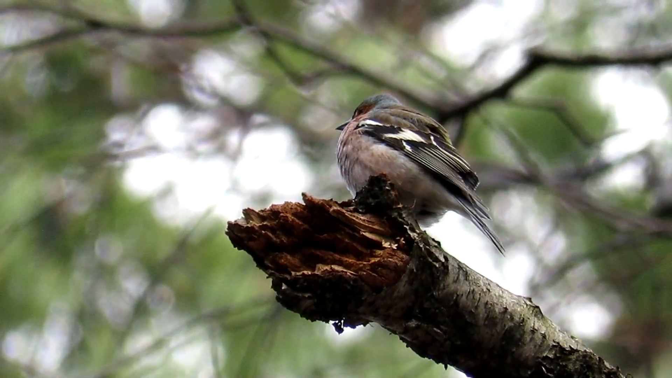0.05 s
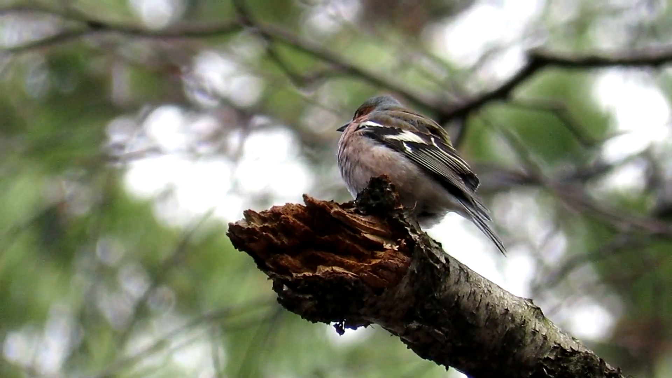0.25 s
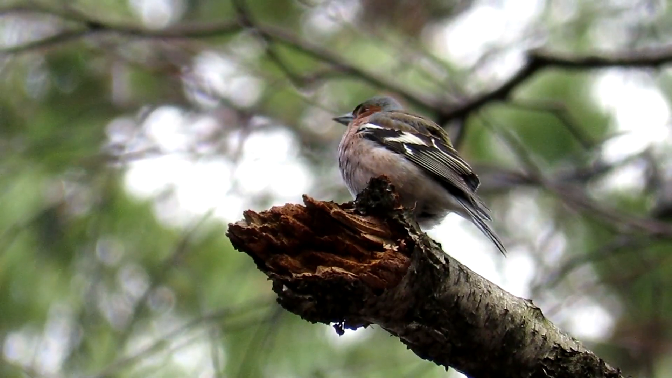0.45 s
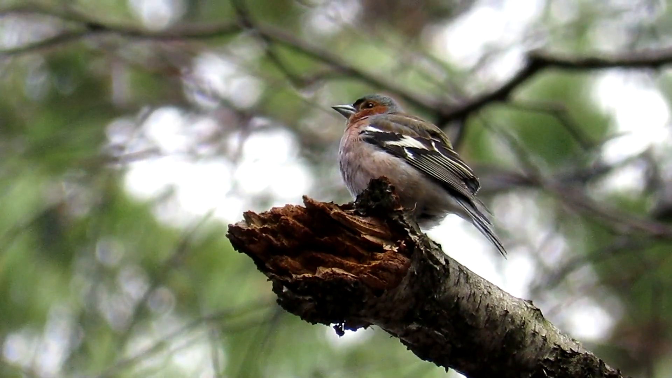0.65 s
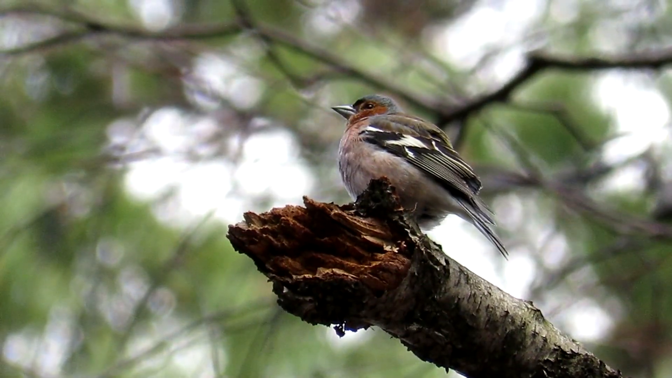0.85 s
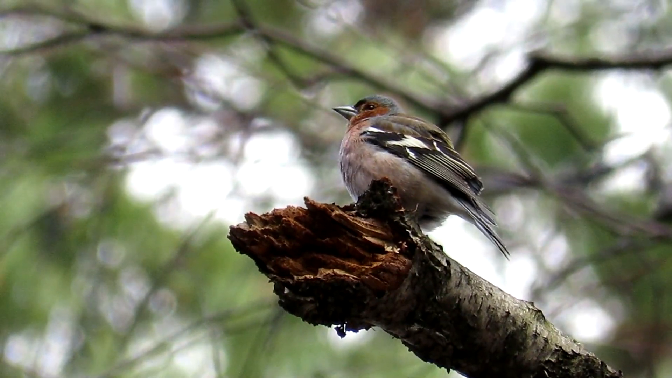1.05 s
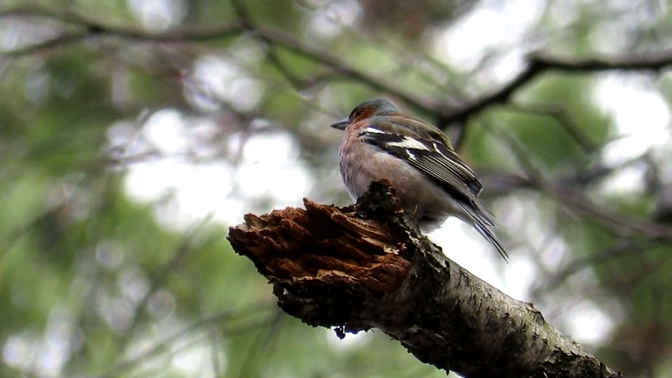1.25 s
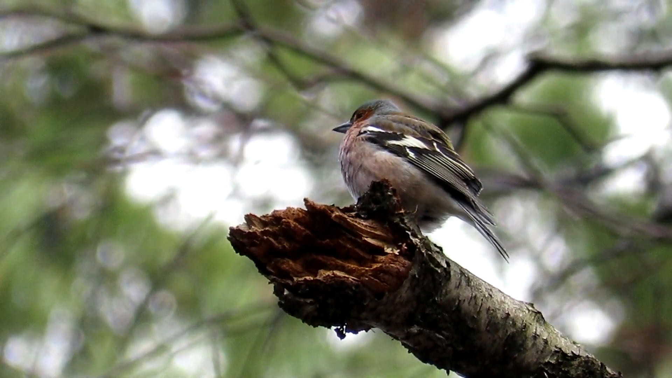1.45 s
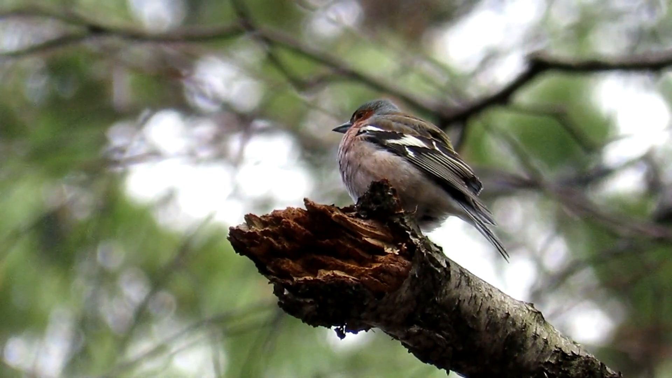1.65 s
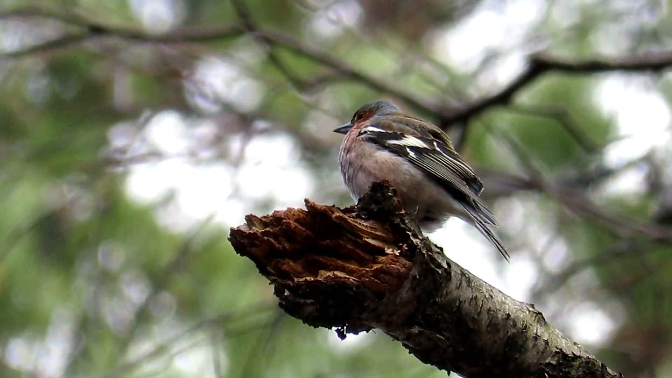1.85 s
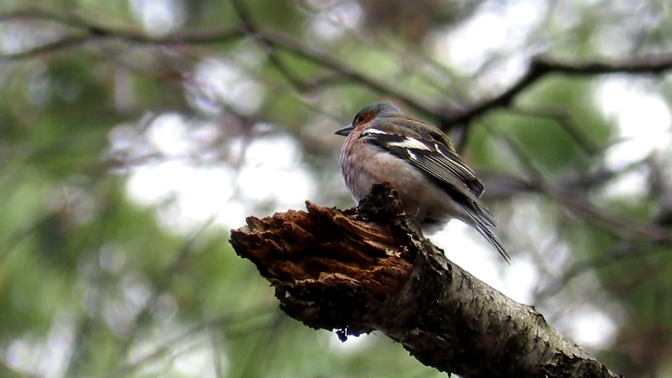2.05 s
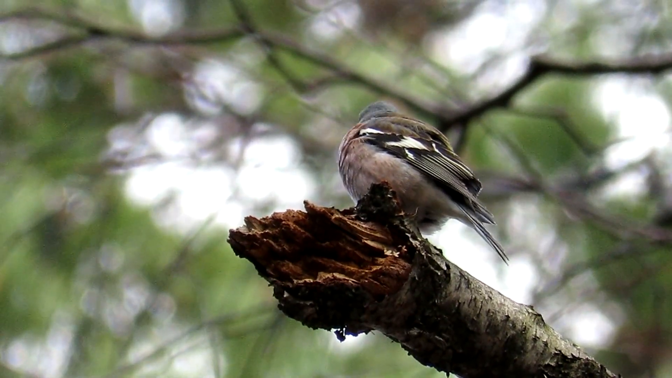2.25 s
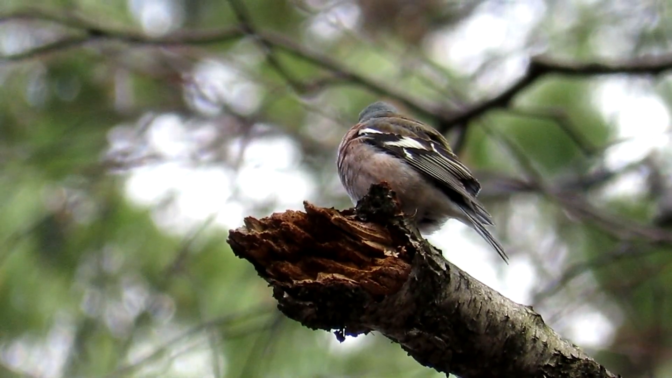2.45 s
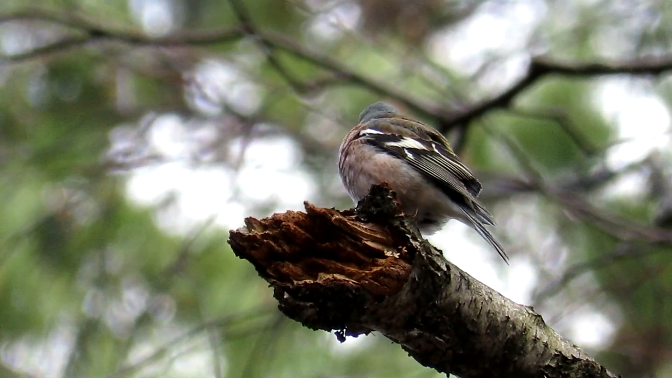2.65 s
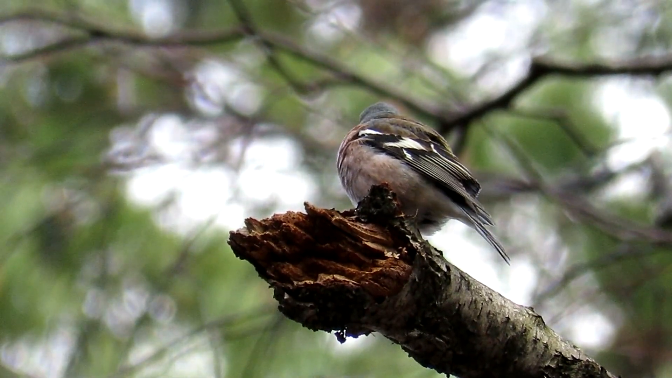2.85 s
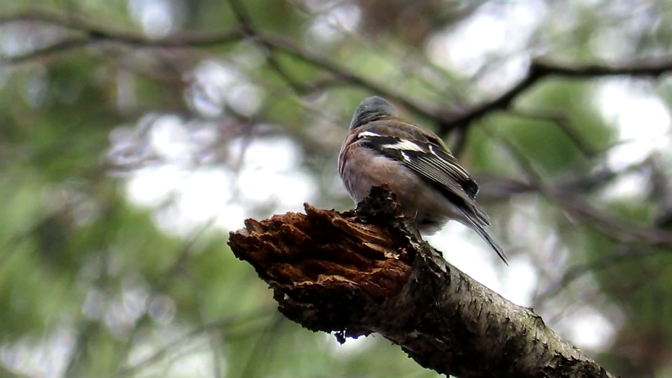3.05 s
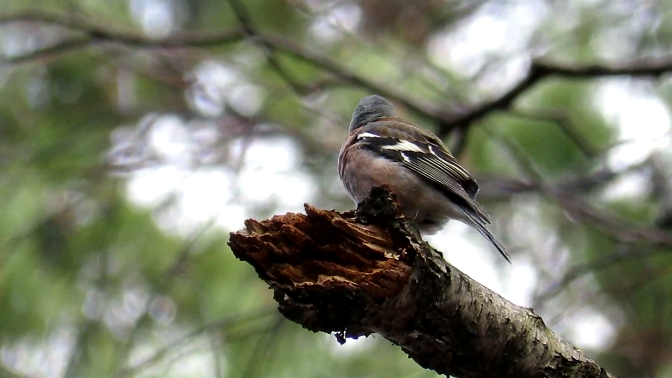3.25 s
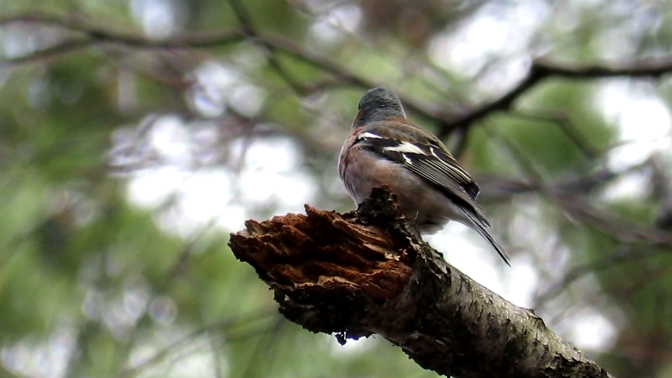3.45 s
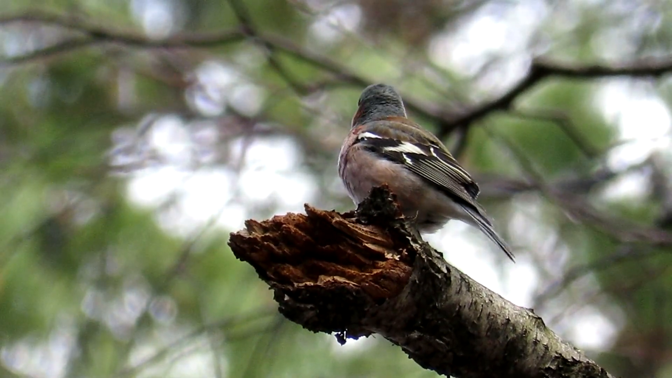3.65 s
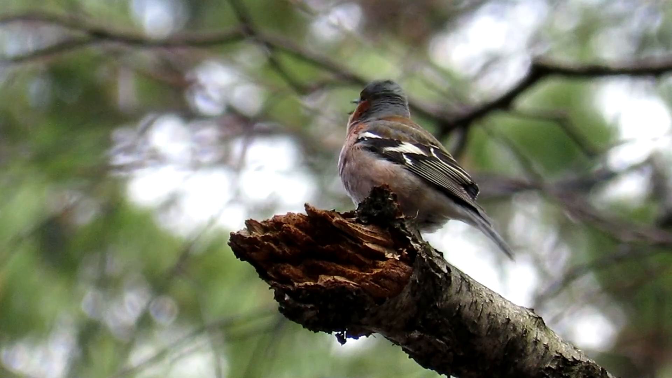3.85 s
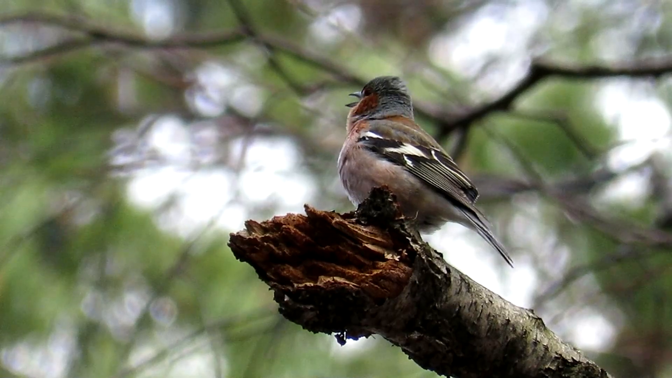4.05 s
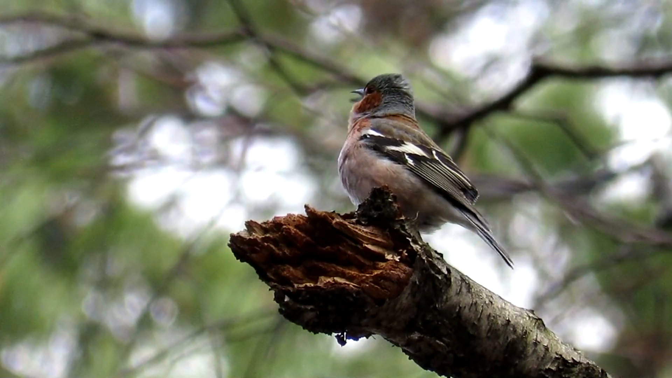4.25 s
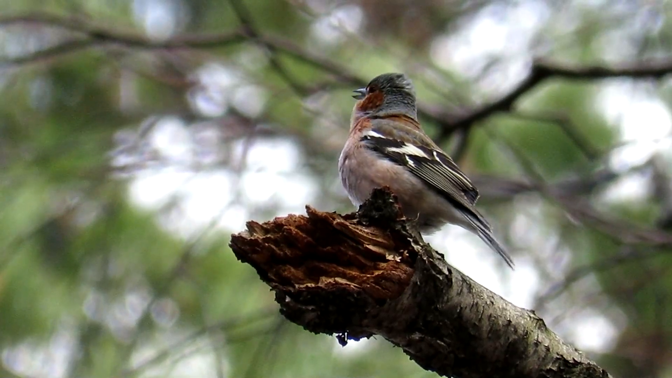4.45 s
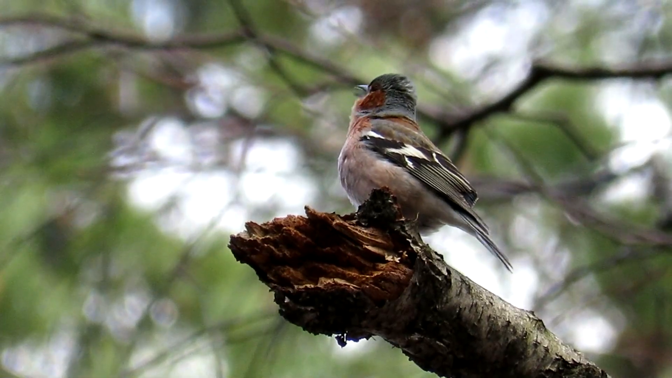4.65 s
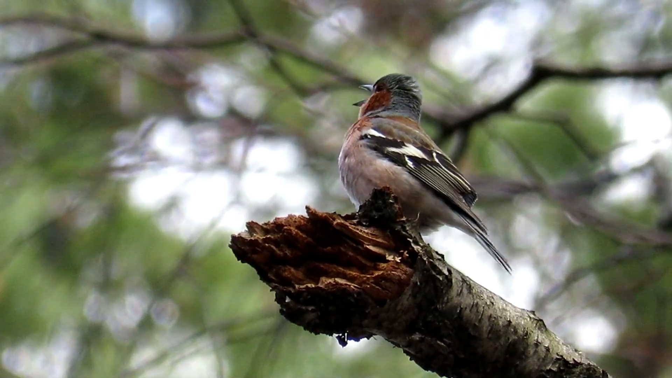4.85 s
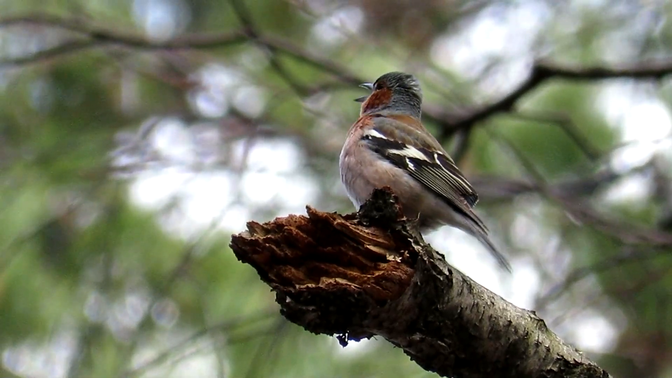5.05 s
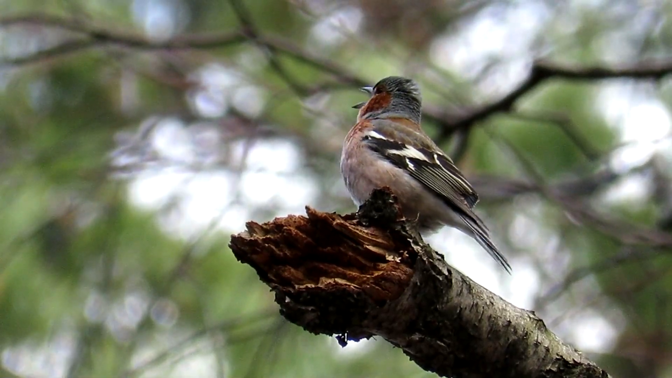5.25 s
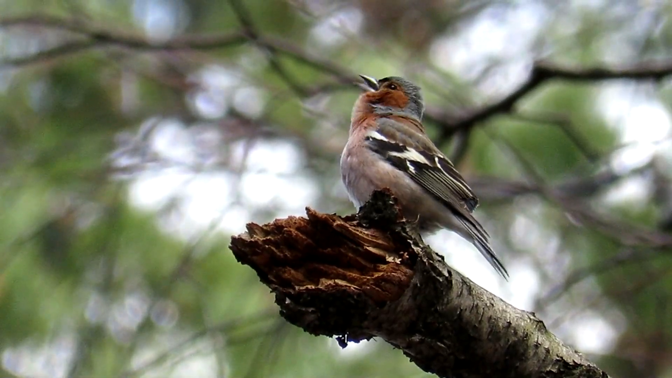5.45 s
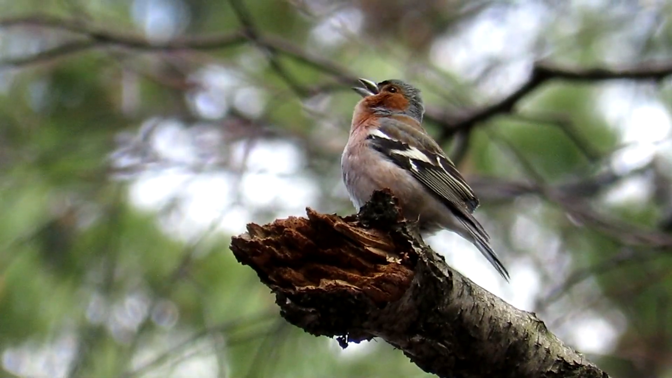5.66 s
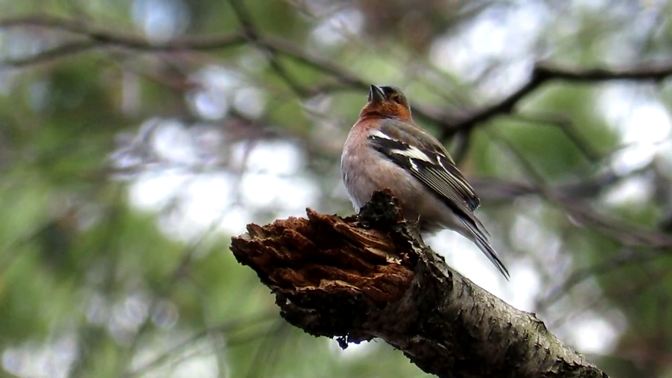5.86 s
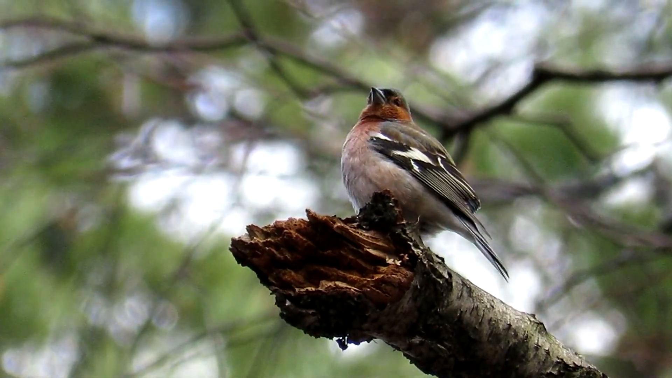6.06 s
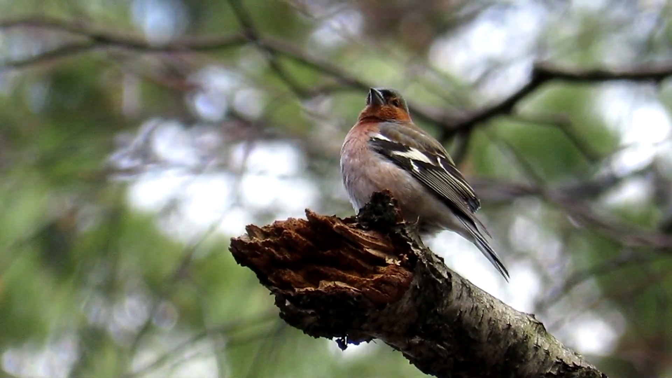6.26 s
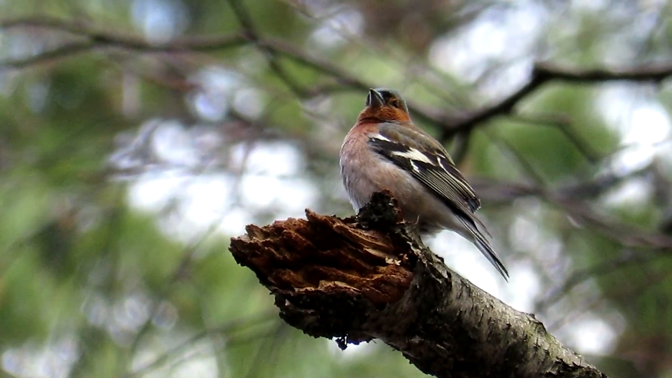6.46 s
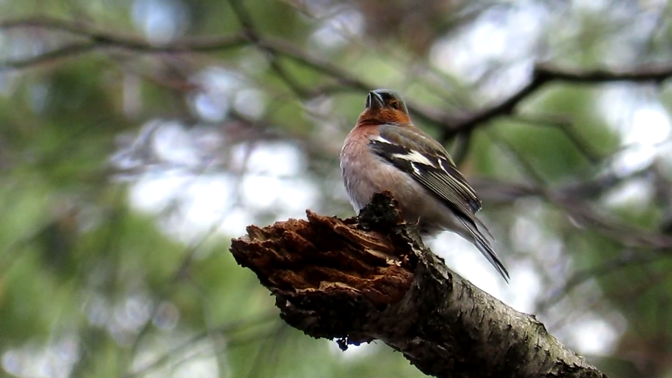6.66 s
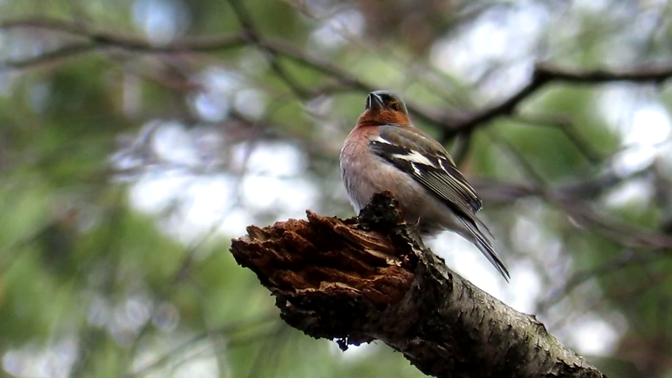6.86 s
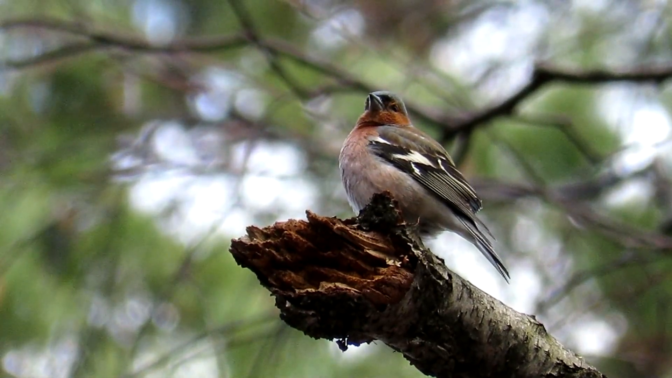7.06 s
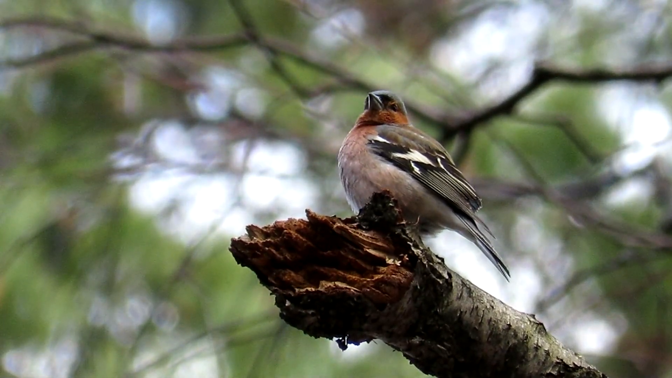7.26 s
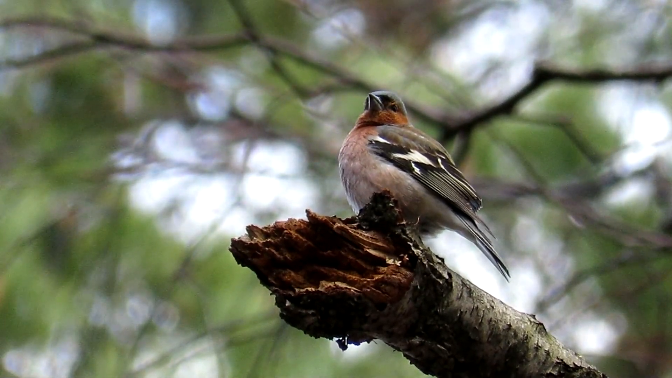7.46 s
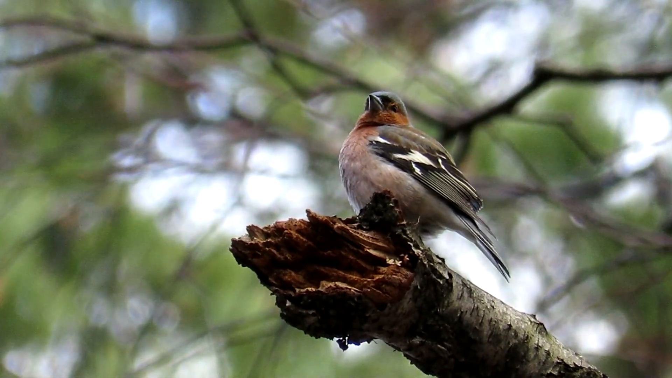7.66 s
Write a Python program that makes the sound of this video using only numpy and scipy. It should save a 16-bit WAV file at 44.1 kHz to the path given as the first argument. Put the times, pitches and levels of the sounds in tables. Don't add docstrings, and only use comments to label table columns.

```python
import sys
import numpy as np
from scipy import signal
from scipy.fft import rfft, irfft, next_fast_len
from scipy.io import wavfile
from scipy.ndimage import uniform_filter1d, map_coordinates

SR = 44100
rng = np.random.default_rng(int(sys.argv[2]) if len(sys.argv) > 2 else 0)


def makeup_ratio(level_db):
    decades = np.asarray(level_db, float) / 20
    return 10 ** decades


def transcribe(signal):
    frames = np.atleast_2d(signal).T
    limited = np.clip(frames, -1, 1)
    pcm = np.round(limited * 32767).astype(np.int16)
    wavfile.write(sys.argv[1], SR, pcm)


N = 339570


def unit(x):
    return x / np.sqrt(np.mean(x ** 2) + 1e-20)


def along(points, hz):
    f, value = np.transpose(points)
    return np.interp(np.log(hz + 1), np.log(f + 1), value)


def wobble(rate, size=N):
    knots = rng.standard_normal(int(size * rate / SR) + 4)
    return map_coordinates(knots, [np.arange(size) * rate / SR])


def noise(spectrum):
    m = next_fast_len(N)
    white = rfft(rng.standard_normal(m))
    colour = makeup_ratio(along(spectrum, np.fft.rfftfreq(m, 1 / SR)))
    return unit(irfft(white * colour, m)[:N])


def breath(voice, db, size, spectrum):
    return makeup_ratio(db) * uniform_filter1d(abs(voice), size=size) * noise(spectrum)


def add(out, s, hz, gain, overtone_db, edge=0.00076):
    t = np.arange(len(hz)) / SR
    phase = 2 * np.pi * np.cumsum(hz) / SR
    ends = np.sin(np.pi / 2 * np.clip(np.minimum(t, t[-1] - t) / edge, 0, 1)) ** 2
    tone = np.sin(phase) + makeup_ratio(overtone_db) * np.sin(2 * phase)
    out[round(s * SR):][:len(t)] += gain * ends * tone


def tracks(rows):
    s, *cols = np.transpose(rows)
    t = np.arange(s[0], s[-1], 1 / SR)
    return s[0], [uniform_filter1d(np.interp(t, s, c), size=70, mode="nearest") for c in cols]


def whistles(rows, bend, overtone_db, shake_db, waver=0.0095, swell_db=0):
    out = np.zeros(N + SR)
    for s, length, first, last, db in rows:
        u = np.linspace(-1, 1, round(length * SR))
        hz = first + (last - first) * (bend + u / 2 + (.5 - bend) * u ** 2)
        hz = hz * (1 + waver * wobble(79.0, size=len(u)))
        shake = wobble(82, size=len(u))
        level_db = db + swell_db * u - 0.44 * u ** 2 + shake_db * (shake - shake.mean())
        add(out, s, hz, makeup_ratio(level_db), overtone_db)
    return out[:N]


def held(rows, sag):
    return [(s, length, hz * (1 + sag / 2), hz * (1 - sag / 2), db) for s, length, hz, db in rows]


def buzzes(notes, throb, uneven, uneven_db, lean=0, dwell=0):
    out = np.zeros(N + SR)
    for rate, swing, rows in notes:
        s, (hz, db) = tracks(rows)
        flutter_hz = rate * (1 + uneven * wobble(69.7, size=len(hz)))
        turn = 2 * np.pi * np.cumsum(flutter_hz) / SR
        gain = makeup_ratio(db + uneven_db * wobble(94.0, size=len(hz))) * (1 - throb * np.cos(turn + lean))
        swung_hz = hz * (1 + swing * (np.sin(turn) + dwell * np.cos(2 * turn)))
        add(out, s, swung_hz, gain, overtone_db=-50)
    return out[:N]


# [t/s, level/dB]
SHIFTS = [
    (.02, -34),
    (.22, -35),
    (.42, -43),
    (1.12, -49),
    (2.8, -55),
    (5.3, -51),
    (6.17, -44.5),
    (7.11, -44),
]
# [f/Hz, level/dB]
CASE_THUD = [(11, -39), (18, 4), (27, -20), (64, 5), (130, -7.5), (170, -60), (290, -120)]
# [f/Hz, level/dB]
CASE_CREAK = [(300, -36), (450, -6), (495, 5), (540, -8), (1200, -12.5), (1600, -46)]


def grip():
    hold_db, settle_t60_s, onset_s = -55, 0.7, 0.013
    since = np.arange(N) / SR - np.array(SHIFTS)[:, :1]
    decay = makeup_ratio(np.array(SHIFTS)[:, 1:] - 60 * since.clip(0) / settle_t60_s)
    shifts = decay * np.clip(since / onset_s, 0, 1)
    hold = makeup_ratio(hold_db + 1.8 * wobble(6))
    level = np.sqrt(hold ** 2 + np.sum(shifts ** 2, axis=0))
    thud = unit(noise(CASE_THUD) * makeup_ratio(0.65 * wobble(20.83)))
    return level * (thud + makeup_ratio(-11.0) * noise(CASE_CREAK))


# [f/Hz, level/dB]
SHARED_AIR = [(59, -27), (100, -1), (215, 0), (433, -0.5), (705, -4), (818, 0.5), (950, -4.5), (1420, -9.5),
              (1720, -15.5), (2750, -17), (3120, -17.5), (3940, -16.5), (5190, -21), (15000, -23),
              (16000, -28)]
# [f/Hz, level/dB]
MICROPHONE_HISS = [(18, -74), (30, -44), (70, -34), (141, -6), (287, 1.5), (649, 0), (2290, -9), (2900, -8),
                   (5450, -9.5), (14800, -11.5), (16000, -11)]
# [f/Hz, level/dB]
ELECTRONIC_WHINE = [(15106, -75)]


def background():
    t = np.arange(N) / SR
    whine = sum(makeup_ratio(db + 7.0) * np.sin(2 * np.pi * hz * t) for hz, db in ELECTRONIC_WHINE)
    drift_db = .4 * wobble(1.5)
    mid = makeup_ratio(-43 + drift_db) * noise(SHARED_AIR) + grip() + whine
    side = makeup_ratio(-51.0) * noise(MICROPHONE_HISS)
    return np.array([mid + side, mid - side])


# [f/Hz, level/dB]
CHORUS_COLOUR = [(1800, 2), (2300, 11), (2900, 13), (3300, 9.5), (4000, 4), (4600, -37), (5300, -30)]
# [t/s, level/dB]
CHORUS_LEVEL = [(0, -57), (.4, -59.5), (1.8, -61), (2.4, -54.5), (4.3, -53), (6, -51), (7.1, -51.5),
                (7.4, -62), (7.7, -78)]


def chorus():
    z = signal.stft(noise(CHORUS_COLOUR), nperseg=1024)[2]
    field = uniform_filter1d(rng.standard_normal(z.shape), size=3, axis=0)
    field = uniform_filter1d(field, size=9, axis=1)
    patches = makeup_ratio(5.5 * unit(field))
    song = unit(signal.istft(z * patches, nperseg=1024)[1][:N])
    return makeup_ratio(np.interp(np.arange(N) / SR, *np.transpose(CHORUS_LEVEL))) * song


# [t/s, length/s, f/Hz, level/dB]
VEILED_NOTES = [(6.12, .08, 2720, -48), (6.22, .08, 2760, -52), (6.43, .2, 2790, -52),
                (6.7, .11, 2800, -48), (6.745, .035, 2250, -56), (7.0, .2, 2780, -53),
                (7.25, .2, 2750, -56), (6.1, .06, 2230, -55), (3.0, .1, 3260, -52), (2.25, .4, 2330, -57),
                (3.88, .18, 2780, -52), (4.08, .2, 2750, -49), (7.38, .08, 4480, -64),
                (4.11, .19, 4020, -41), (3.9, .1, 3900, -46), (6.37, .02, 2680, -46),
                (6.325, .025, 2280, -51), (6.81, .12, 2600, -55), (.02, .2, 2650, -57)]


def veiled_bird():
    notes = held(VEILED_NOTES, sag=0)
    return whistles(notes, bend=.5, overtone_db=-45, shake_db=2, waver=.012) * wobble(260)


# [t/s, length/s, f/Hz, level/dB]
HELD_NOTES = [(.02, .073, 4050, -55), (.32, .07, 4680, -61), (.44, .05, 2250, -59), (.56, .09, 2290, -57),
              (.81, .076, 4130, -53), (1.0, .06, 5090, -52), (1.06, .12, 2260, -59),
              (6.32, .025, 7880, -55), (6.445, .044, 4500, -55), (6.51, .02, 6900, -55),
              (6.8, .075, 4900, -47), (7.01, .02, 6800, -59), (7.09, .045, 4220, -53),
              (7.11, .03, 6830, -60), (7.14, .07, 4020, -58), (7.47, .013, 3570, -47),
              (7.64, .05, 3720, -57)]
# [t/s, length/s, first f/Hz, last f/Hz, level/dB]
SLURRED_NOTES = [(6.085, .012, 4000, 3900, -44), (6.097, .011, 3900, 3500, -42),
                 (6.51, .02, 3600, 3800, -46), (6.53, .024, 3850, 5000, -48), (6.553, .01, 5000, 5080, -50),
                 (6.745, .033, 4600, 4350, -45), (6.88, .075, 4900, 4600, -48),
                 (7.235, .06, 4720, 4520, -48), (7.295, .06, 4500, 4460, -45), (5.49, .04, 7480, 7250, -57),
                 (6.44, .011, 4500, 4350, -43), (6.663, .009, 4350, 4250, -48),
                 (7.525, .11, 4120, 3880, -55)]


def calls():
    notes = SLURRED_NOTES + held(HELD_NOTES, sag=.015)
    return whistles(notes, bend=.5, overtone_db=-40, shake_db=3, waver=.01)


# [f/Hz, level/dB]
BARK_RETURN = [(1500, -15), (2300, -7.5), (3300, .5), (4500, 1.5), (5500, 0), (6500, -3)]
# [f/Hz, t60/s]
WOOD_FADE = [(1500, 1), (3500, 0.93), (5500, 0.61), (7000, 0.64)]
# [delay t/s, spread/s, level/dB]
TRUNK_STANDS = [(.022, .008, 3), (.083, .015, 2.2)]


def wood(x, clump_db, delay):
    hz, t, z = signal.stft(rng.standard_normal(3 * SR // 2), SR, nperseg=256)
    fade_db = along(BARK_RETURN, hz)[:, None] - 60 * t / along(WOOD_FADE, hz)[:, None]
    tail = signal.istft(z * makeup_ratio(fade_db), SR, nperseg=256)[1]
    lag = delay + np.arange(len(tail)) / SR
    stands_db = sum(db * np.exp(-((lag - s) / spread) ** 2) for s, spread, db in TRUNK_STANDS)
    tail = tail * makeup_ratio(stands_db + clump_db * wobble(127.4, size=len(tail)))
    tail = np.pad(tail, (round(delay * SR), 0))
    return signal.fftconvolve(x, tail)[:N] / np.sqrt(SR / 14)


# [flutters per s, swing as share of pitch, rows of (t/s, f/Hz, level/dB)]
FAR_BUZZES = [
    (104.6, .04, [(1.58, 3760, -47), (1.615, 3750, -51), (1.65, 4150, -57), (1.69, 4500, -56), (1.73, 4750, -55)]),
    (173, 0.071, [(2.58, 4750, -54), (2.63, 4950, -58), (2.78, 4800, -64)]),
    (135.5, 0.11, [(1.2, 4120, -52.5), (1.38, 3770, -67)]),
    (154.8, .1, [(2.77, 3694, -54), (2.85, 2970, -44.5), (2.97, 2330, -51), (3.07, 2470, -53)]),
    (188, 0.045, [(3.635, 7850, -56), (3.68, 7500, -48), (3.71, 6850, -44), (3.74, 6200, -43), (3.775, 5850, -47)]),
    (150, 0.05, [(3.73, 7300, -55), (3.78, 6700, -49), (3.83, 6200, -55)]),
    (170, .045, [(5.93, 4750, -51), (5.97, 4900, -51)]),
    (170, .04, [(6.63, 8000, -60), (6.65, 8500, -54), (6.68, 8100, -54)]),
]


def distant_buzzes():
    return buzzes(FAR_BUZZES, throb=0.31, uneven=0.112, uneven_db=2.5)


# [t/s, length/s, first f/Hz, last f/Hz, level/dB]
RIVAL_FALLS = [
    (1.535, .025, 4230, 3370, -47.5),
    (1.88, .078, 4290, 2780, -43),
    (2.11, .034, 4450, 2500, -45),
    (2.288, .031, 5100, 2800, -47.5),
    (2.318, .017, 2800, 2550, -46),
    (2.47, .036, 5120, 2500, -45.5),
    (3.163, 0.032, 4010, 3180, -40),
]
# [t/s, level/dB]
RIVAL_HOOKS = [
    (2.058, -45),
    (2.244, -44.5),
    (2.428, -41),
]


def rival():
    hooks = [(s, .025, 2560, 3250, db) for s, db in RIVAL_HOOKS]
    falls = whistles(RIVAL_FALLS, bend=0.6, overtone_db=-40, shake_db=6.0, waver=0.0079)
    return falls + whistles(hooks, bend=.72, swell_db=2, overtone_db=-40, shake_db=2)


# [t/s, length/s, first f/Hz, last f/Hz, level/dB]
WARBLER_UP = [(1.855, .015, 3760, 4100, -48), (3.06, .03, 3350, 4360, -54), (6.184, .008, 3550, 4550, -38),
              (6.265, .01, 3450, 4950, -42), (6.414, .026, 3520, 4550, -38), (6.778, .02, 4400, 5100, -53),
              (7.04, .014, 2600, 4300, -46), (7.21, .03, 4300, 4720, -51.5)]
# [t/s, length/s, first f/Hz, last f/Hz, level/dB]
WARBLER_DOWN = [(6.1, .025, 6620, 4000, -56), (6.325, .048, 6100, 2800, -47),
                (6.345, .044, 7800, 4550, -55), (6.388, .017, 4500, 3600, -39),
                (6.405, .01, 3600, 3380, -46), (6.645, .01, 4420, 2870, -49),
                (6.672, .008, 4250, 3000, -48), (6.902, .012, 4000, 1900, -47),
                (6.53, .03, 6800, 6100, -59), (6.192, .012, 4500, 3500, -44),
                (6.274, .006, 4900, 3900, -48), (6.624, .008, 4200, 3400, -51),
                (6.792, .008, 4900, 3500, -53), (6.82, .006, 4800, 4000, -54),
                (6.861, .008, 4500, 3500, -53)]


def warbler():
    up = whistles(WARBLER_UP, bend=.55, overtone_db=-40, shake_db=2.5, waver=.012)
    down = whistles(WARBLER_DOWN, bend=.5, overtone_db=-40, shake_db=3, waver=.012, swell_db=2.5)
    return up + down


# [t/s, length/s, first f/Hz, last f/Hz, level/dB]
NEIGHBOUR_CHIPS = [
    (3.315, 0.016, 5700, 6400, -62.5),
    (3.36, 0.035, 6170, 5280, -48),
    (3.495, .015, 6200, 6450, -53),
    (3.535, 0.022, 6000, 5370, -38.5),
]
# [t/s, level/dB]
NEIGHBOUR_RISES = [
    (4.789, -28),
    (5.025, -28.5),
    (5.061, -28),
    (5.125, -50),
    (5.171, -32.5),
    (5.213, -28),
]
# [t/s, length/s, first f/Hz, last f/Hz, level/dB]
NEIGHBOUR_LAST = [
    (5.249, 0.0164, 3670, 4330, -21),
]


def neighbour():
    rises = [(s, 0.0259, 3960, 4380, db) for s, db in NEIGHBOUR_RISES] + NEIGHBOUR_LAST
    chips = whistles(NEIGHBOUR_CHIPS, bend=0.72, overtone_db=-48, shake_db=4.0)
    return chips + whistles(rises, bend=0.35, overtone_db=-36, shake_db=1.0, swell_db=1.0)


# [delay t/s, level/dB]
NEAR_ECHOES = [
    (.004, -10),
    (.012, -14),
    (.021, -11),
]


def trunks(x):
    return sum(makeup_ratio(db) * np.pad(x, (round(delay * SR), 0))[:N] for delay, db in NEAR_ECHOES)


# [t/s, level/dB]
SYLLABLE_TIMES = dict( up=[(3.635, -36), (3.858, -30.5), (4.0775, -26)], lead=[(3.94, -48.5),
                  (4.155, -46.5)], down=[(3.7215, -27.5), (3.94, -25.5), (4.152, -23)], tick=[(4.49, -28.5),
                  (4.737, -28), (4.9845, -27)], spike=[(4.525, -26.5), (4.7735, -26), (5.022, -27.5)],
                  short_dip=[(4.319, -22.5)], dip=[(4.553, -22), (4.7995, -23.5), (5.049, -21.5)],
                  first_arch=[(4.3905, -21.5)], arch=[(4.637, -20), (4.8855, -18.5), (5.133, -20)])
# [t/s after start, f/Hz, level/dB]
SLIDE_SHAPES = dict( up=[(.012, 3150, -18), (.02, 3520, 0), (.026, 3870, 0), (.031, 4150, -7),
                (.041, 4750, -12), (.047, 4950, -17)], lead=[(0, 6140, -8), (.03, 4700, 1)],
                down=[(.034, 4410, -9), (.04, 4050, -8), (.043, 3844, -6), (.058, 3444, -0.5),
                (.066, 3240, -1.5), (.072, 3190, -5.5), (.077, 3220, 2)])
# [t/s after start, f/Hz, level/dB]
FIGURE_SHAPES = dict( tick=[(.003, 5100, -9), (.006, 5200, -4), (.012, 4850, -6), (.015, 4600, -15),
                 (.02, 4080, -1), (.025, 3850, 2), (.031, 3500, -6)], spike=[(.001, 4780, -9),
                 (.007, 5050, -5), (.0115, 5600, -4), (.0135, 6400, -11), (.015, 7400, -22),
                 (.0165, 6200, -14), (.019, 5200, -10)], short_dip=[(0, 3785, -4), (.014, 3090, -2),
                 (.028, 2866, -6), (.038, 2975, -6), (.044, 3890, -3), (.056, 4090, -11)],
                 dip=[(.002, 3460, 5), (.005, 3618, -1.5), (.022, 2780, 1), (.036, 2420, -12),
                 (.048, 2777, -7), (.057, 3510, 2), (.069, 3995, -3)], first_arch=[(.002, 1950, -16),
                 (.012, 2433, -6.5), (.023, 3060, 1.5), (.032, 3330, -0.5), (.04, 3340, -4.5),
                 (.047, 2950, 0), (.053, 2166, -12), (.057, 1500, -15)], arch=[(.002, 1990, -17.5),
                 (.012, 2342, -5), (.023, 2890, -1.5), (.03, 3165, 0), (.037, 3218, -1), (.045, 2900, -1),
                 (.051, 2117, -9.5), (.0565, 1430, -23)])


def syllables():
    trough_hz, swing_hz, flutter_hz = 589, 304, 168
    out = np.zeros(N + SR)
    for name, shape in {**SLIDE_SHAPES, **FIGURE_SHAPES}.items():
        lead, (hz, db) = tracks(shape)
        low = np.clip(2 * (hz.min() + trough_hz - hz) / trough_hz, 0, 1) * ("dip" in name)
        turn = 2 * np.pi * flutter_hz * np.arange(len(hz)) / SR
        flutter = swing_hz * low * np.cos(turn + 0.19)
        for s, level_db in SYLLABLE_TIMES[name]:
            sung_hz = hz * (1 + 0.0052 * rng.standard_normal()) + flutter
            add(out, s + lead, sung_hz, makeup_ratio(db + level_db + 4.5), overtone_db=-51, edge=.0015)
    return out[:N]


# [t/s, length/s, first f/Hz, last f/Hz, level/dB]
CLOSING_NOTES = [(5.803, .009, 3300, 3050, -30), (5.813, .009, 2750, 4200, -30),
                 (5.822, .011, 4100, 4000, -40), (5.834, .007, 4200, 2650, -27),
                 (5.81, .02, 2200, 2350, -43), (5.83, .01, 2350, 1600, -37), (4.298, .005, 4700, 7000, -42),
                 (4.306, .004, 7000, 4700, -42), (4.14, .004, 5600, 6500, -49),
                 (4.146, .004, 6500, 5600, -49), (3.633, .02, 3000, 3400, -50),
                 (5.822, .013, 7200, 8500, -55)]
# [f/Hz, level/dB]
PUFF_AIR = [(1500, -30), (2100, 0), (4200, -1), (5200, -13), (8500, -20), (10500, -36)]


def small_notes():
    notes = whistles(CLOSING_NOTES, bend=.55, overtone_db=-33, shake_db=2.5)
    return notes + breath(notes, -5.5, 300, PUFF_AIR)


# [t/s, peak level/dB, f/Hz]
RASP_BEATS = [(5.2824, -20, 4030), (5.2874, -23, 3940), (5.2922, -18, 3920), (5.2985, -12.5, 4000),
              (5.3034, -14, 3880), (5.3091, -13, 3910), (5.315, -16, 3900), (5.3218, -13.5, 3840),
              (5.3274, -11.5, 4000), (5.3324, -12, 3900), (5.337, -17, 3930), (5.3462, -24, 3810),
              (5.3496, -19, 4030), (5.357, -23, 4070), (5.3609, -15, 4050), (5.3674, -26, 3950),
              (5.3734, -11, 4140), (5.3814, -20, 3770), (5.3857, -22, 4240), (5.3922, -14, 4090),
              (5.397, -15, 4120), (5.4022, -15.5, 4360), (5.408, -19, 3950), (5.4124, -15, 3970),
              (5.4194, -19, 3570), (5.425, -14, 4050), (5.433, -19.5, 4200), (5.4394, -22, 4000),
              (5.4437, -22, 4150), (5.452, -25, 4170)]


def strokes():
    length_s, fall, level_db = .0046, .12, -3
    out = np.zeros(N + SR)
    u = np.linspace(-1, 1, round(length_s * SR))
    for s, db, hz in RASP_BEATS:
        add(out, s, hz * (1 - fall * u / 2), makeup_ratio(db + level_db), overtone_db=-42, edge=length_s / 2)
    return out[:N]


# [flutters per s, swing as share of pitch, rows of (t/s, f/Hz, level/dB)]
BUZZY_NOTES = dict( high=(186, .085, [(5.247, 5800, -46), (5.255, 5700, -31), (5.27, 5600, -28),
               (5.287, 4950, -33)]), under=(168, .07, [(5.305, 3350, -37), (5.35, 3300, -31),
               (5.4, 3200, -33), (5.43, 3300, -29), (5.455, 2950, -36), (5.475, 3100, -34),
               (5.495, 3500, -31)]), swoop=(168, .11, [(5.503, 3400, -27), (5.515, 2920, -21),
               (5.531, 2200, -23.5), (5.547, 1970, -27.5), (5.563, 2100, -27), (5.578, 2920, -21),
               (5.612, 3340, -20.5), (5.637, 3100, -21.5), (5.668, 2130, -24.5)]),
               drone=(120, .15, [(5.668, 2200, -27.5), (5.71, 2150, -28.5), (5.728, 2120, -30),
               (5.743, 1930, -33)]))
# [f/Hz, level/dB]
RASP_HISS = [(2300, -22), (3400, 9), (4500, 4), (6500, -7), (8000, -13), (9500, -18)]
# [f/Hz, level/dB]
HIGH_HISS = [(5000, -30), (6500, 0), (7600, -2), (8600, -30)]


def flourish():
    high = buzzes([BUZZY_NOTES["high"]], throb=.7, uneven=.08, uneven_db=2)
    rasp = strokes() + buzzes([BUZZY_NOTES["under"]], throb=.7, uneven=.2, uneven_db=3)
    swoop = buzzes([BUZZY_NOTES["swoop"]], throb=.78, uneven=.04, uneven_db=1.2, lean=.8, dwell=.1)
    drone = buzzes([BUZZY_NOTES["drone"]], throb=.65, uneven=.07, uneven_db=1.5, lean=-.6, dwell=-.15)
    rasp = rasp + breath(rasp, -15, 60, RASP_HISS)
    high = high + breath(high, -14, 60, HIGH_HISS)
    return high + rasp + swoop + drone


# [f/Hz, level/dB]
BEAK_AIR = [(1200, -40), (2500, 7), (5000, 3), (12000, -18), (16000, -14)]


def finch():
    song = syllables() + small_notes() + flourish()
    return song + breath(song, -28.5, 90, BEAK_AIR)


def scene():
    veiled = veiled_bird()
    far = calls() + distant_buzzes() + rival() + warbler()
    near = neighbour() + finch()
    late = np.arange(N) > 5.9 * SR
    wet = np.where(late, makeup_ratio(-5), makeup_ratio(-1.5))
    echoes = trunks(near) + makeup_ratio(-4.8) * wood(near, clump_db=2.2, delay=.006)
    echoes = echoes + wood(wet * (far + veiled), clump_db=1.5, delay=.003)
    return near + far + 0.7 * veiled + echoes + chorus() + background()


def top_cut(x):
    return signal.sosfilt(signal.butter(12, 16930, fs=SR, output="sos"), x)


def record(dry):
    top_hz = 15750
    m = next_fast_len(N)
    passed = np.fft.rfftfreq(m, 1 / SR) < top_hz
    mix = irfft(rfft(dry, m) * passed, m)[:, :N]
    return top_cut(mix)


dry = scene()
out = record(dry)
transcribe(out)
```